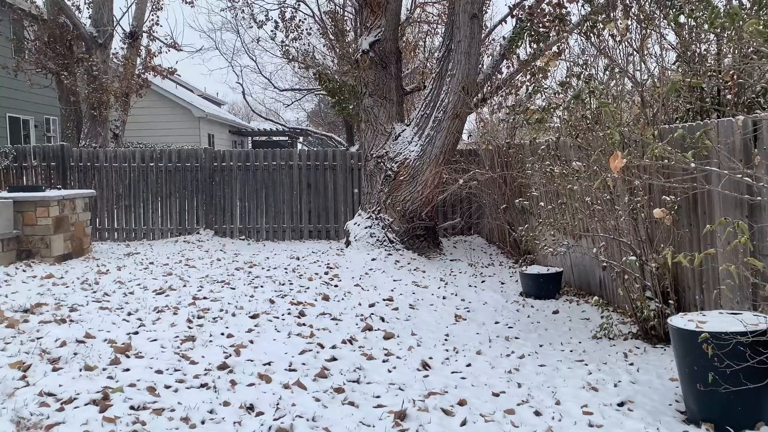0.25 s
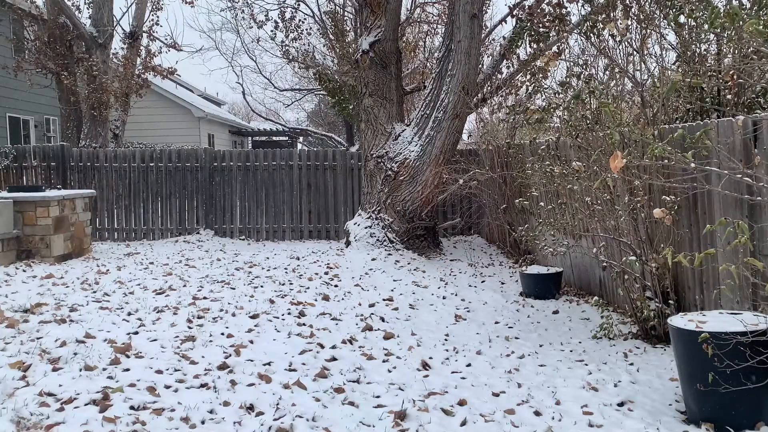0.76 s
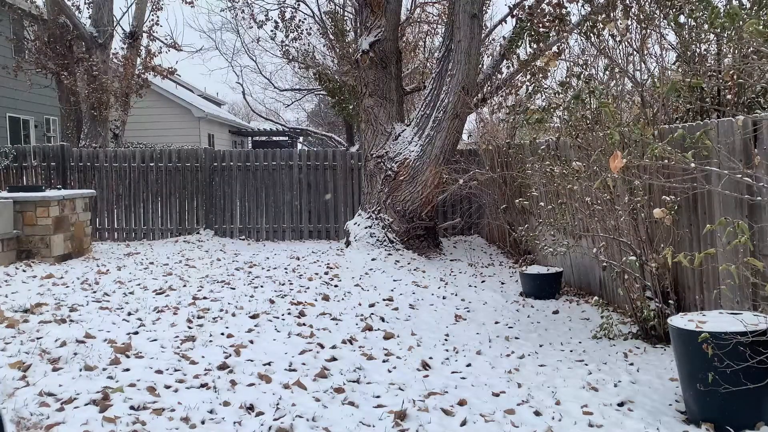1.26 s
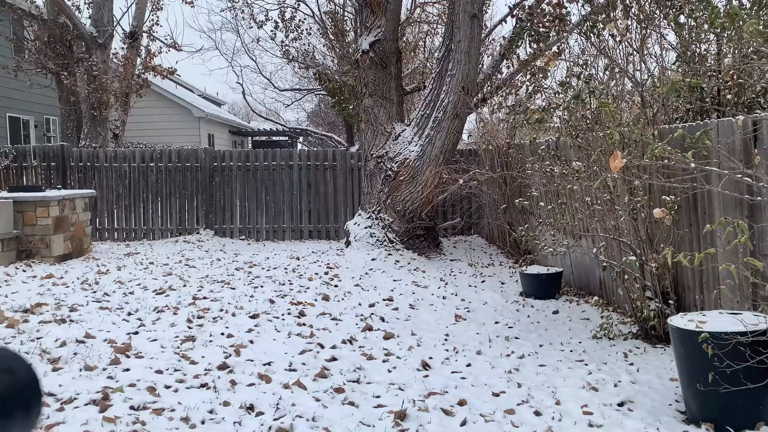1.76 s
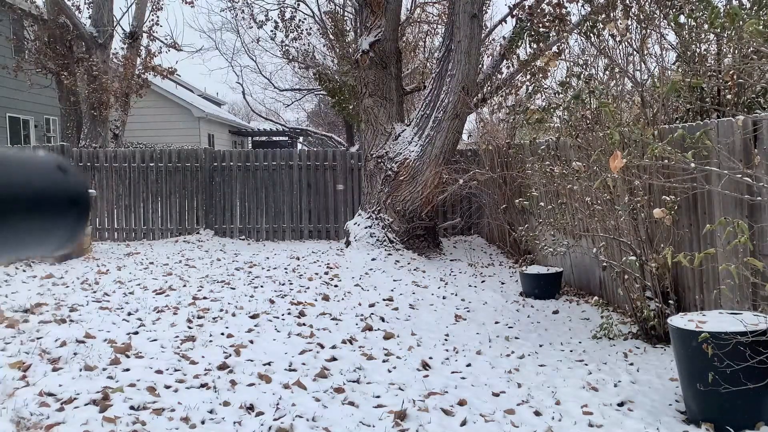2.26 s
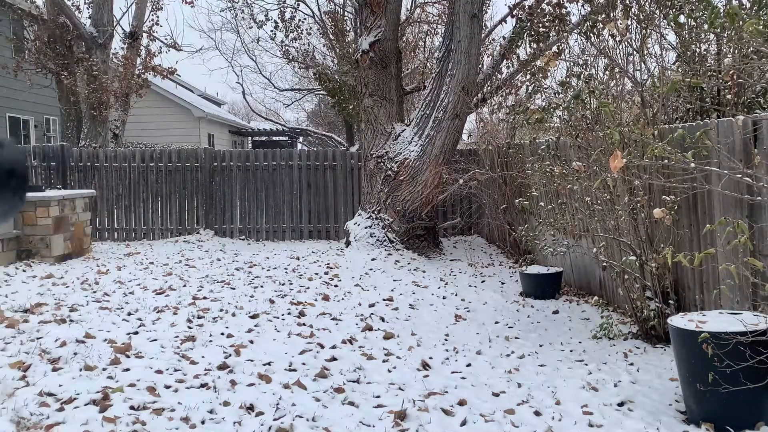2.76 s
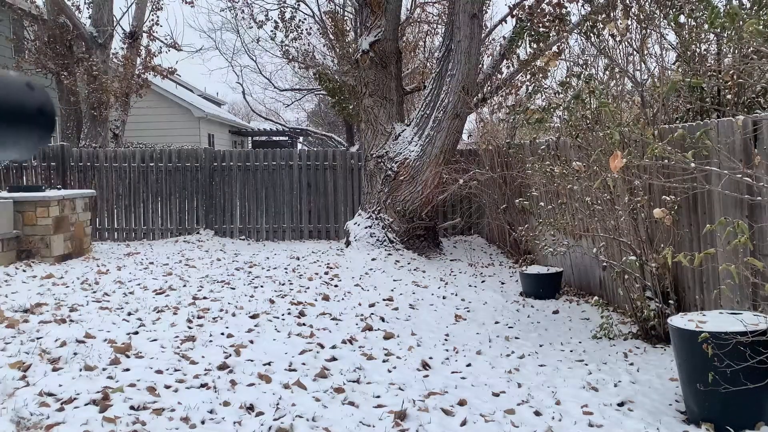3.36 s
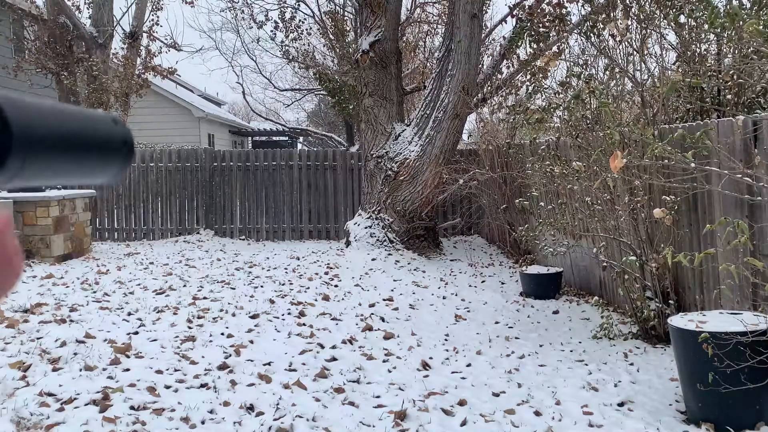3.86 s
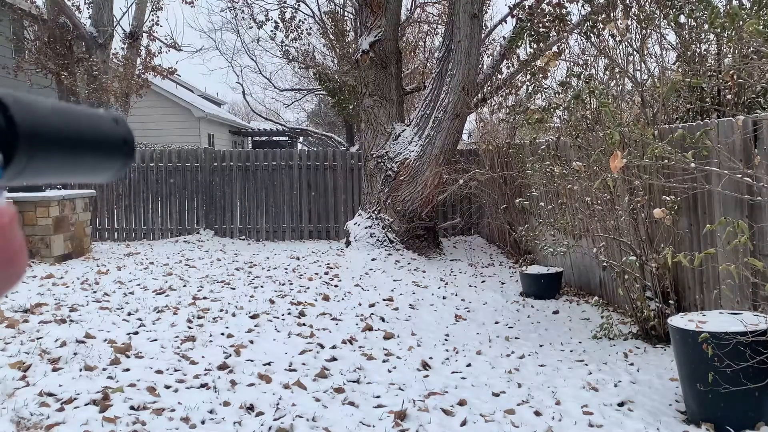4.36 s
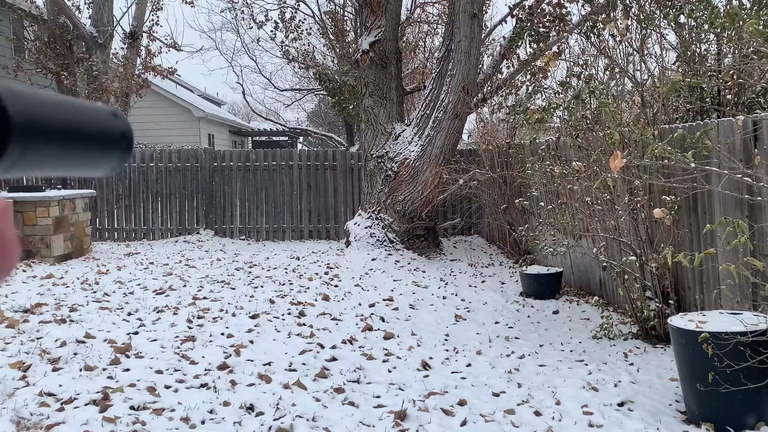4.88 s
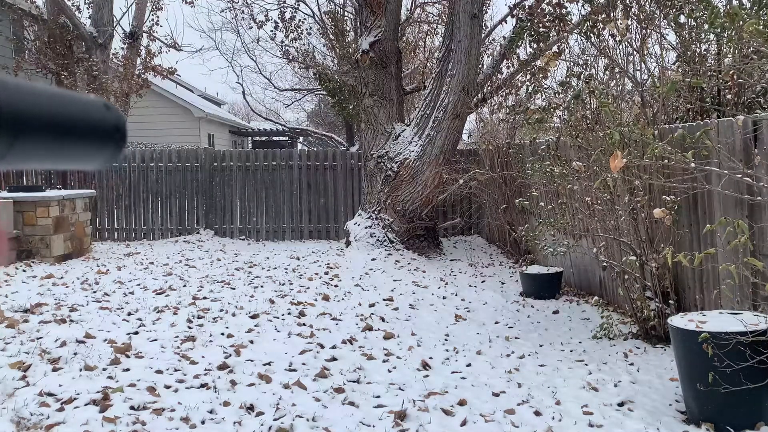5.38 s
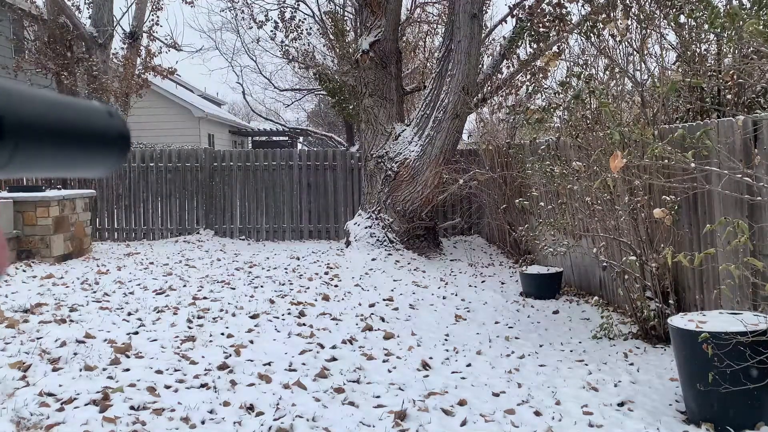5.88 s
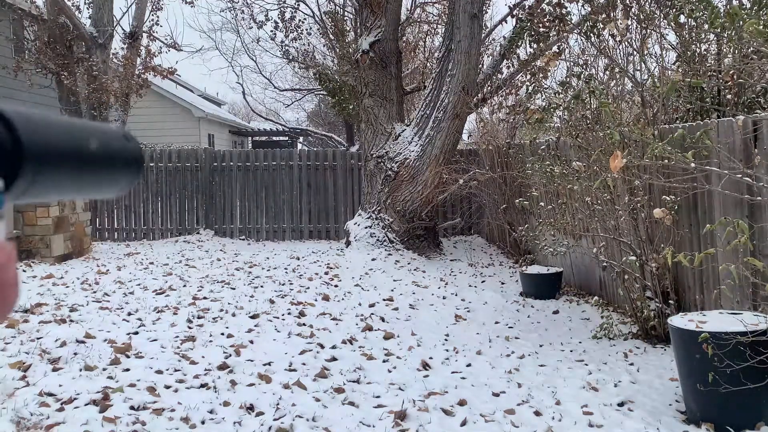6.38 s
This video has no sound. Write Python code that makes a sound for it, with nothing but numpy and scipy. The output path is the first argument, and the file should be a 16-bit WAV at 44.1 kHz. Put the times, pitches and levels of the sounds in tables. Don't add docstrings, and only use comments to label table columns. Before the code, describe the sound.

A battery-powered toy gun chatters in bursts right beside the microphone, outdoors. Dry plastic slams and cracks repeat fast over rattling gears and a whirring motor that spins up, strains and coasts. Between bursts come small ticks on wooden boards, dull knocks and slight rustling over faint distant hum. Midway the blaster is turned and its tone changes slightly. Fences and walls return weak, dull echoes.

```python
import sys
import numpy as np
from scipy import signal
from scipy.fft import rfft, irfft, next_fast_len
from scipy.io import wavfile
from scipy.ndimage import uniform_filter1d, map_coordinates

SR = 44100
rng = np.random.default_rng(int(sys.argv[2]) if len(sys.argv) > 2 else 0)


def attenuation_scalar(level_db):
    decades = np.asarray(level_db, float) / 20
    return 10 ** decades


def wrap_up_sound(samples):
    columns = np.atleast_2d(samples).T
    tamed = np.clip(columns, -1, 1)
    steps = np.round(tamed * 32767).astype(np.int16)
    wavfile.write(sys.argv[1], SR, steps)


N = 292383
TIME_S = np.arange(N) / SR
CYCLE_S = .0745
MUZZLE_LAG_MS, GEARBOX_LAG_MS = .3, .46
TURNED_S = 3


def shaped(x, points):
    hz, db = np.transpose(points)
    n = next_fast_len(N, True)
    log_hz = np.log(np.maximum(np.arange(n // 2 + 1) * SR / n, 1))
    gain = attenuation_scalar(np.interp(log_hz, np.log(hz), db))
    return irfft(rfft(x, n) * gain, n)[..., :N]


def hiss(points):
    return shaped(rng.standard_normal(N), points)


def level(x, db):
    return x * attenuation_scalar(db) / np.sqrt(np.mean(x ** 2))


def wobble(rate_hz):
    width = int(SR / rate_hz)
    return level(uniform_filter1d(uniform_filter1d(rng.standard_normal(N), width), width), 0)


def pan(left_minus_right_db):
    return attenuation_scalar(np.array([[left_minus_right_db], [-left_minus_right_db]]) / 2)


def add_mode(out, s, hz, db, t60_s, rise_s):
    i = np.arange(max(int(s * SR) + 1, 0), min(int((s + t60_s) * SR) + 1, N))
    t = i / SR - s
    out[i] += attenuation_scalar(db - 60 * t / t60_s) * (1 - np.exp(-t / rise_s)) * np.sin(2 * np.pi * hz * t)


# f/Hz, left minus right level/dB
PORT_BALANCE = [(200, 0), (700, 4.5), (1500, 4.5), (2800, 3), (4400, -2), (8000, -.5), (12000, 0)]


def ports(x, other, lag_ms, unlike):
    late = map_coordinates(x, [np.arange(N) - lag_ms * SR / 1000], order=3)
    share = np.clip(unlike, 0, 1)
    right = np.sqrt(1 - share) * late + np.sqrt(share) * other
    left_tilt = [(hz, db / 2) for hz, db in PORT_BALANCE]
    right_tilt = [(hz, -db / 2) for hz, db in PORT_BALANCE]
    return np.array([shaped(x, left_tilt), shaped(right, right_tilt)])


# f/Hz, level/dB per Hz
YARD_HUM = [(20, -33), (35, -20.5), (52, 3), (70, -4), (110, -15), (250, -11.5), (800, -23.5), (1600, -22),
            (3000, -35), (8000, -39), (16000, -58.5)]
# t/s, length/s, level/dB, f/Hz
RUSTLE = [
    (2.58, .1, -78, 3500),
    (3.01, .08, -74, 4600),
    (3.1, .2, -76, 8500),
    (3.4, .1, -75, 4400),
]


def yard():
    mid = hiss(YARD_HUM) * attenuation_scalar(1.2 * wobble(3))
    side = shaped(hiss(YARD_HUM), [(60, -1.5), (300, -13.5), (700, -.5)])
    hum = level(np.array([mid + side, mid - side]), -68.1)
    rustle = 0
    for s, length_s, db, hz in RUSTLE:
        colour = [(hz / 2, -16), (hz, 0), (hz * 1.5, -7), (hz * 3, -25)]
        cloth = shaped(rng.standard_normal((2, N)), colour)
        swell = np.sin(np.pi * np.clip((TIME_S - s) / length_s, 0, 1)) ** .6
        rustle = rustle + level(cloth, db) * swell
    return hum + rustle * attenuation_scalar(3.5 * wobble(39.8))


# t/s, peak level/dB, centre f/Hz, left minus right level/dB
FENCE_TICKS = [(0.0857, -37.5, 1620, 6), (0.1104, -42.5, 1730, -5), (0.1304, -47, 1750, 8),
               (0.665, -36.5, 1750, -3), (0.6906, -44, 3500, 4), (1.7444, -47.5, 1960, 5),
               (1.8016, -51, 2150, -2), (1.877, -49.5, 3870, 11), (2.3989, -40, 2020, 1.0),
               (2.4803, -52, 2520, -7.5), (2.5704, -48.5, 4440, 1), (2.8502, -64, 7000, -3),
               (3.991, -45, 2740, -3.5), (5.685, -52.5, 2100, 2), (5.7184, -50.5, 4420, -2),
               (6.2088, -36, 2200, 1.5), (6.2342, -43.5, 2250, 1.5), (6.3046, -44, 4130, -2.0),
               (6.3959, -48, 4300, -2.5)]
# t/s, peak level/dB, centre f/Hz, left minus right level/dB
DULL_TAPS = [
    (.044, -47, 800, 3.5),
    (.208, -29, 700, 3),
    (.781, -34, 750, 3),
    (2.433, -54, 810, 5),
    (2.91, -66, 1200, 0),
    (3.012, -49, 1000, 2),
    (3.311, -52, 1000, -3),
    (3.321, -54, 400, -3),
]


def pellets():
    length = 4000
    out, t = np.zeros((2, N + length)), np.arange(length) / SR
    direct = np.exp(-t / 0.0037)
    wall = .3 * (t > .011) * np.exp(-np.abs(t - .011) / 0.0055)
    smear = 0.07 * np.exp(-t / 0.0099)
    for s, db, hz, pan_db in [*FENCE_TICKS, *DULL_TAPS]:
        noise = rng.standard_normal((2, length))
        band = signal.butter(2, [hz / 1.7, min(hz * 2.2, 16000)], "bandpass", fs=SR)
        tick = level(signal.lfilter(*band, noise), db - 7)
        board = level(signal.lfilter(*signal.iirpeak(hz, 6., SR), noise), db - 4)
        i = int(s * SR)
        out[:, i:i + length] += (tick + board) * (direct + wall + smear) * pan(pan_db)
    return out[:, :N]


# first slam t/s, second t/s, last but one t/s, last t/s, shortening of the cycle/ms a shot
BURSTS = [
    (-.32, -.24, -.09, -.016, 0),
    (.2264, .3086, .4602, .5359, 0),
    (.7986, .8794, 1.5581, 1.6353, 0),
    (2.0206, 2.0989, 2.1732, 2.2595, 0),
    (3.5866, 3.6637, 3.7388, 3.8159, 0),
    (4.0833, 4.1621, 5.4874, 5.5741, .09),
    (5.8613, 5.9371, 6.0104, 6.0865, 0),
    (6.5181, 6.5956, 6.67, 6.75, 0),
]


def burst_slams():
    out = []
    for first, second, before_last, last, quicken_ms in BURSTS:
        k = np.arange(round((before_last - second) / CYCLE_S) + 1)
        even = np.linspace(second, before_last, len(k))
        out.append(np.r_[first, even + quicken_ms / 2000 * k * k[::-1], last])
    return out


def heard_slams():
    s = np.concatenate(burst_slams())
    return s[(s > .01) & (s < N / SR - .01)]


# trigger t/s, gears stop t/s, rattle level/dB, run-up whine level/dB
MOTOR = [(-.4, .04, -41, -40), (.183, .615, -42.5, -48), (.748, 1.712, -42, -38), (1.95, 2.32, -38, -33),
         (3.502, 3.87, -37, -24), (4.012, 5.655, -36, -31), (5.775, 6.163, -36, -28),
         (6.448, 6.8, -35, -35)]
# t/s after the trigger, level/dB
GEAR_START = [(0, -32), (.015, -8), (.05, 0)]
# t/s after the stop, level/dB
GEAR_STOP = [(0, -7), (.035, -23), (.08, -31), (.16, -42)]


def running():
    (start_s, start_db), (stop_s, stop_db) = np.transpose(GEAR_START), np.transpose(GEAR_STOP)
    gain = np.zeros(N)
    for s, (on, off, db, _) in zip(burst_slams(), MOTOR):
        times = np.r_[on + start_s, s[-1], off + stop_s]
        levels = np.r_[start_db, 0, stop_db]
        gain += attenuation_scalar(db + np.interp(TIME_S, times, levels, left=-99, right=-99))
    return gain


# f/Hz, level/dB
GEAR_COLOUR = [(900, -8.5), (1400, -3), (1750, 1), (2150, -1.5), (2700, .5), (3000, 0), (3300, -8),
               (3700, -6), (5200, -5.5), (7500, -10.5), (10000, -9.5), (15500, -15)]
# f/Hz, level/dB
RATTLE_DIPS = [(11000, 0), (11500, -14), (12100, -14), (12500, 2), (14400, 1), (14700, -16), (15200, -16),
               (15600, 3)]
# f/Hz, width/Hz, level/dB
CASE_MODES = [(252, 350, -3.5), (650, 150, -2), (800, 240, 0)]
# share of the cycle after a slam, f/Hz, level/dB, t60/s, click level/dB
CLACKS = [
    (.23, 1920, -22.5, 0.0093, -20),
    (0.34, 1700, -25, 0.012, -32),
    (0.572, 1679, -20, 0.015, -31),
    (.76, 1736, -61, 0.004, -27),
    (0.919, 1761, -26, 0.033, -19),
    (0.956, 986, -17, 0.015, -28),
]


def gears():
    def clicks():
        uneven = attenuation_scalar(2.2 * rng.exponential(size=N))
        return rng.standard_normal(N) * uneven * attenuation_scalar(3.1 * wobble(150))

    def rattle():
        bright = shaped(clicks(), [(300, -54.5)] + GEAR_COLOUR)
        return level(shaped(bright, RATTLE_DIPS + [(16000, 0), (16200, -25)]), 6.3) * running()

    def rumble():
        modes = [attenuation_scalar(db) * signal.lfilter(*signal.iirpeak(hz, hz / width, SR), clicks())
                 for hz, width, db in CASE_MODES]
        return level(sum(modes), -5.5) * running()

    knock, tick = np.zeros(N), np.zeros(N)
    slam_s = heard_slams()
    for slam, cycle in zip(slam_s, np.diff(slam_s)):
        if cycle >= .1:
            continue
        for (share, hz, db, t60_s, click_db), c in zip(CLACKS, rng.standard_normal((len(CLACKS), 3))):
            at = slam + share * cycle + .0004 * c[0]
            add_mode(knock, at, hz * (1 + 0.01 * c[1]), db + 1.6 * c[2], t60_s, .0002)
            i = int(at * SR)
            tick[i:i + 150] += attenuation_scalar(click_db) * np.exp(-np.arange(150) / 12.0)
    tick_colour = [(500, -24.5), (1500, 1.5), (3000, -4.5), (6000, -8.5), (10000, -16), (16000, -23.5)]
    ticks = [level(hiss(tick_colour), 4.6) * tick for _ in range(2)]
    unlike = .25
    return (ports(rattle(), rattle(), GEARBOX_LAG_MS, unlike)
            + ports(rumble(), rumble(), MUZZLE_LAG_MS, 0.03)
            + ports(knock, 0 * knock, GEARBOX_LAG_MS, 0)
            + ports(*ticks, GEARBOX_LAG_MS, unlike))


# f/Hz at the end of the last pull, f/Hz where the coast begins, coast level/dB
WIND_DOWN = [(2500, 1729, -40), (2450, 2300, -42), (2100, 1713, -38), (1543, 1500, -55), (2600, 2400, -34),
             (1725, 1900, -40), (2500, 1815, -34), (2500, 1800, -40)]


def sweeps():
    pull_from, pull_to = .24, .92
    usual_s = .0735
    out = []
    for s, (on, off, _, up_db), (end_hz, coast_hz, coast_db) in zip(burst_slams(), MOTOR, WIND_DOWN):
        a, b = on + .028, s[0] - .012
        out.append((a, b, 1570, 1570 + 13500 * (b - a), up_db - 3, up_db))
        for slam, cycle in zip(s[:-2], np.diff(s)):
            hz0 = 215. / (usual_s * (cycle / usual_s) ** 0.85)
            hz1 = 187. / (usual_s * (cycle / usual_s) ** 0.53)
            end_db = -28.5 - 2.5 * (slam > TURNED_S)
            out.append((slam + cycle * pull_from, slam + cycle * pull_to, hz0, hz1, -31.5, end_db))
        last_pull_end = min(s[-1] - .009, s[-2] + .07)
        out.append((s[-2] + CYCLE_S * pull_from, last_pull_end, 2880, end_hz, -31, -33.5))
        a = s[-1] + .018
        out.append((a, off, coast_hz, coast_hz - 19000 * (off - a), coast_db, coast_db))
    return [row for row in out if row[0] >= 0]


# multiple, level/dB
WHINE_ORDERS = [(1, 0), (2, -12), (3, -25)]


def whine():
    hz, gain = np.zeros(N), np.zeros(N)
    for t0, t1, hz0, hz1, db0, db1 in sweeps():
        i = slice(int(t0 * SR), int(t1 * SR))
        bend = .65 if hz1 > hz0 else 1.15 if hz1 > .8 * hz0 else 1.7
        hz[i] = hz0 + (hz1 - hz0) * np.clip((TIME_S[i] - t0) / (t1 - t0), 0, 1) ** bend
        gain[i] = attenuation_scalar(np.interp(TIME_S[i], [t0, t1], [db0, db1]))
    turning_s = [2.4, 3.4]
    gain = uniform_filter1d(gain, size=260) * attenuation_scalar(np.interp(TIME_S, turning_s, [3, -.5]))
    slow = uniform_filter1d(np.clip((2300 - hz) / 900, 0, 1) * (hz > 0), size=260)
    gain = gain * attenuation_scalar((1.8 + 3.5 * slow) * wobble(150) - 9 * slow)
    phase = 2 * np.pi * np.cumsum(hz * (1 + .006 * wobble(300))) / SR
    gain = gain * (1 + 0.47 * np.sin(phase / 11 + wobble(40)))
    facing_db = np.interp(TIME_S, turning_s, [-9, 0])
    tone = np.zeros(N)
    for k, db in WHINE_ORDERS:
        overtone_db = (facing_db + 3.5 * wobble(60)) * (k > 1)
        tone += attenuation_scalar(db + overtone_db) * np.sin(k * phase)
    tone = np.sqrt(2) * gain * tone
    return ports(tone, 0 * tone, GEARBOX_LAG_MS, 0)


def puff(s, db):
    snap_hz, thud_hz, fall_s, t60_s, rise_s = 1200, 100, .0007, .0124, .005
    i = int(s * SR) + 1 + np.arange(int(t60_s * SR))
    t = i / SR - s
    turns = thud_hz * t + (snap_hz - thud_hz) * fall_s * (1 - np.exp(-t / fall_s))
    return i, attenuation_scalar(db - 60 * t / t60_s) * (1 - np.exp(-t / rise_s)) * np.sin(2 * np.pi * turns)


# start t/ms, f/Hz, level/dB, t60/s
CRACK_MODES = [(-.05, 1700, 2, .006), (-.05, 2350, -9.5, 0.011), (-.05, 3760, -11, 0.013),
               (-.04, 5264, -6, .007), (-.03, 7330, -8, 0.0043), (-.02, 9940, -24.5, 0.0031),
               (-.02, 13770, -30, .005), (-.02, 15540, -26, 0.0041)]
BORE_MODES = {"empty": [(.52, 650, 5.5, .006), (.52, 640, -10.5, .027), (.52, 810, -22, .06),
              (.3, 1220, -20, .008)], "loaded": [(.63, 710, 1.4, .0082), (.63, 575, -4.5, .011),
              (.63, 830, -10.5, .045), (.3, 1220, -20, .008)]}
EMPTY_SHOTS = [0, 1, 2, 9, 11, 14, 15, 19, 25, 27, 34, 36, 43, 48, 49]
HARD_SHOTS = [5, 22, 26, 30, 40, 44, 49]


def slams():
    ring, rush, snap = np.zeros(N), np.zeros(N), np.zeros(N)
    i = np.arange(-200, 300)
    t = i / SR
    rush_shape = np.where(t < 0, np.exp(t / .0015), np.exp(-t / 0.00072))
    snap_shape = np.exp(-np.abs(t) / .0003)
    for k, s in enumerate(heard_slams()):
        bore = BORE_MODES["empty" if k in EMPTY_SHOTS else "loaded"]
        thump_db = 0.2 + 1.8 * (k in HARD_SHOTS)
        crack_db = -5.3 + .9 * rng.standard_normal()
        for body_db, modes, scatter_db, rise_s in ((thump_db, bore, .7, .0004),
                                                   (crack_db + 0.13, CRACK_MODES, 2.5, .00002)):
            for (ms, hz, db, t60_s), c in zip(modes, rng.standard_normal((len(modes), 3))):
                mode_db = body_db + db + scatter_db * c[0]
                add_mode(ring, s + ms / 1000, hz * (1 + .012 * c[1]), mode_db, t60_s * attenuation_scalar(1.3 * c[2]), rise_s)
        at, swing = puff(s - .00067, thump_db + 7)
        ring[at] += swing
        rush[int(s * SR) + i] += attenuation_scalar(crack_db) * rush_shape
        snap[int(s * SR) + i] += attenuation_scalar(crack_db) * snap_shape
    air = [(1000, -2), (3000, -12), (5200, 4.5), (8000, -16), (12000, -6), (16000, -17.5)]
    edge = [(3000, -30), (5000, -3), (12000, 0), (17000, 3)]
    blasts = [level(hiss(air), -8) * rush + level(hiss(edge), -12) * snap for _ in range(2)]
    return ports(ring, 0 * ring, MUZZLE_LAG_MS, 0) + ports(*blasts, MUZZLE_LAG_MS, .25)


# f/Hz, level/dB
FACING = [
    [(850, 0), (1250, -6), (1700, 0), (4200, 0), (6000, 2), (8500, 0), (12000, -2.5)],
    [(800, 0), (1000, -2.5), (1300, 2.5), (1800, 0), (5200, 0), (6800, -2), (8000, 1)],
]


def scene():
    small = signal.butter(3, 113, "highpass", fs=SR, output="sos")
    blaster = signal.sosfilt(small, slams() + whine() + gears())
    turned = np.arange(N) > TURNED_S * SR
    before = shaped(blaster, FACING[0]) * pan(1.2) * ~turned
    after = shaped(blaster, FACING[1]) * turned
    blaster = before + after

    t = np.arange(SR // 2) / SR
    decay = attenuation_scalar(-60 * t / .55) * (t > .03)
    tail = rng.standard_normal((2, len(t))) * decay * attenuation_scalar(1.3 * wobble(90)[:len(t)])
    tail = signal.lfilter(*signal.butter(2, [500, 1300], "bandpass", fs=SR), tail)
    echo = signal.fftconvolve(blaster.mean(axis=0, keepdims=True), tail, axes=1)[:, :N]
    return blaster + attenuation_scalar(-59) * echo + pellets() + yard()


def low_pass(x):
    return signal.sosfilt(signal.butter(12, 16990, fs=SR, output="sos"), x)


# f/Hz, level/dB
TREBLE_DIPS = [(8000, 0), (9000, -6), (10200, 0), (11200, -4), (11900, -11), (12700, -3), (13700, 0),
               (15000, -10), (15700, -2), (16600, -14)]


def record(dry):
    heard = shaped(dry, TREBLE_DIPS)
    soft = heard / (1 + np.abs(heard / .8) ** 6) ** (1 / 6)
    no_bass = signal.sosfilt(signal.butter(4, 42, "highpass", fs=SR, output="sos"), soft)
    mix = signal.sosfilt(signal.ellip(8, .2, 70, 16300, fs=SR, output="sos"), no_bass)
    return low_pass(mix)


dry = scene()
out = record(dry)
wrap_up_sound(out)
```